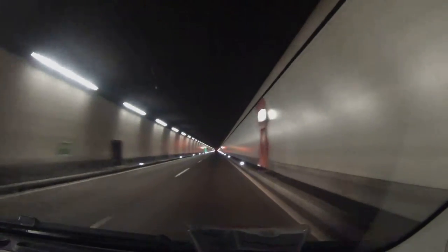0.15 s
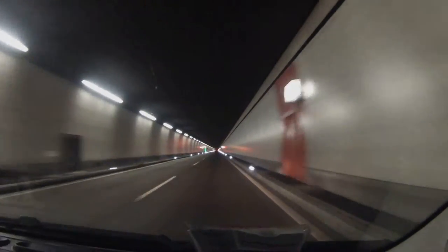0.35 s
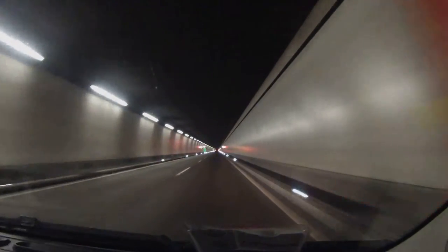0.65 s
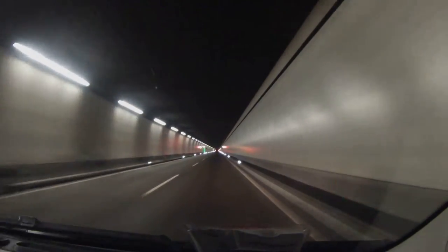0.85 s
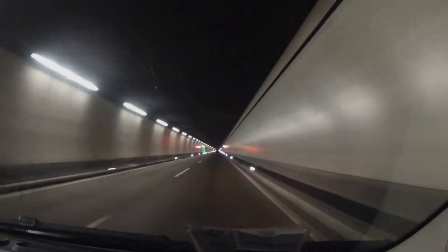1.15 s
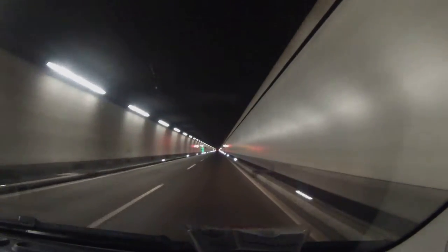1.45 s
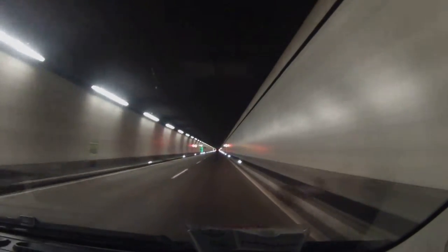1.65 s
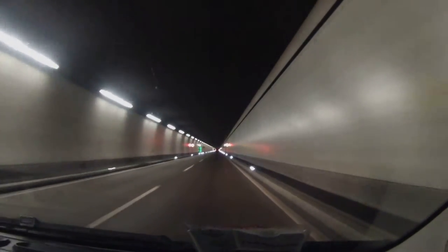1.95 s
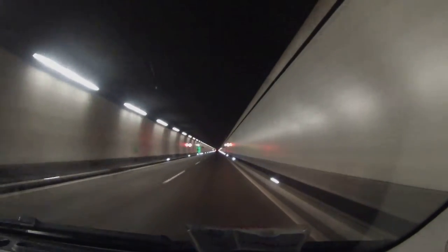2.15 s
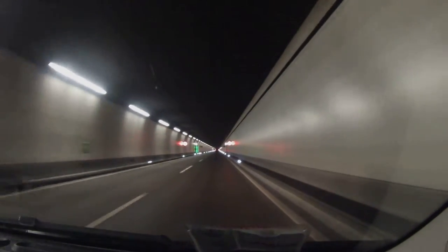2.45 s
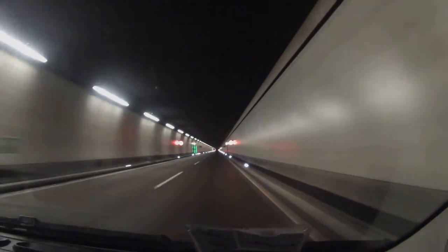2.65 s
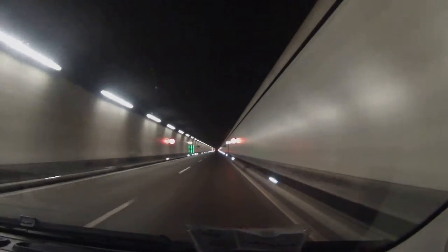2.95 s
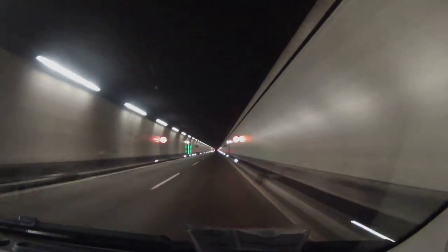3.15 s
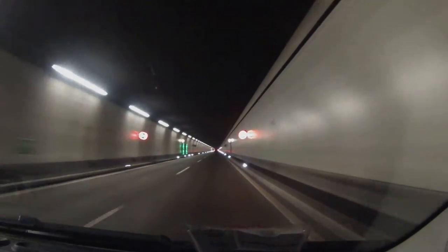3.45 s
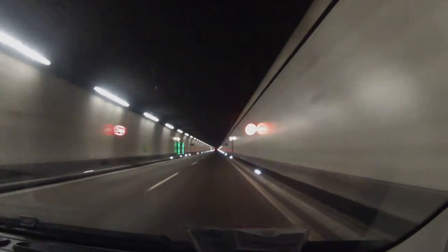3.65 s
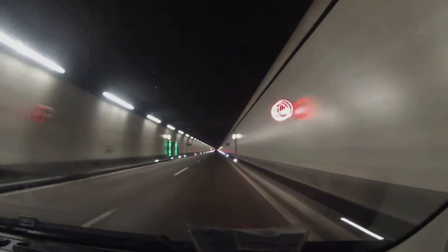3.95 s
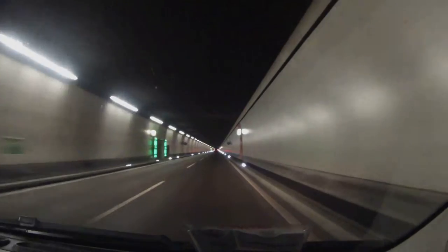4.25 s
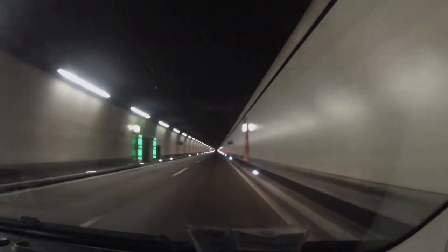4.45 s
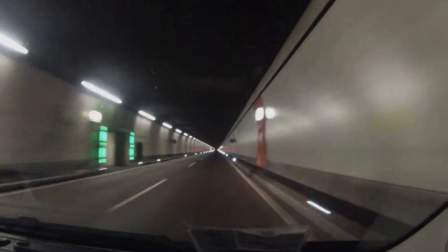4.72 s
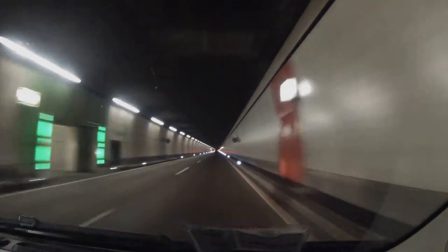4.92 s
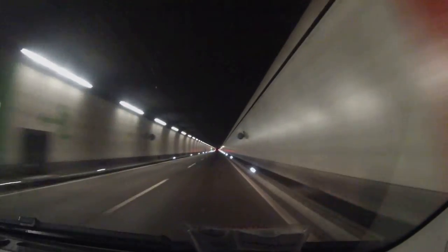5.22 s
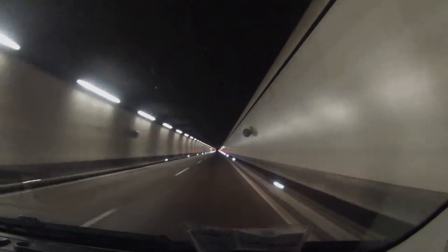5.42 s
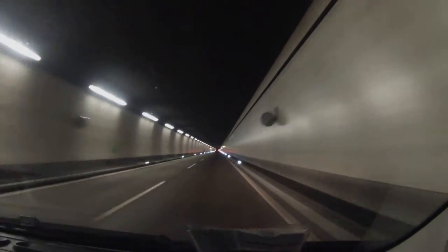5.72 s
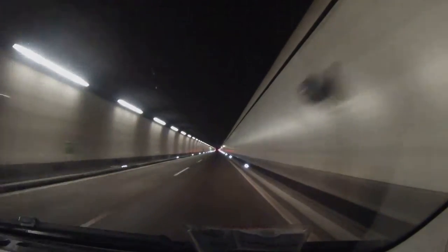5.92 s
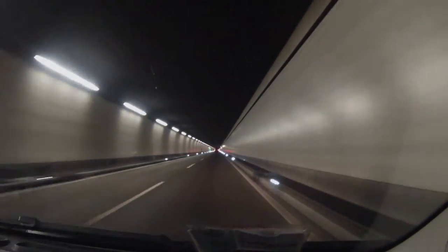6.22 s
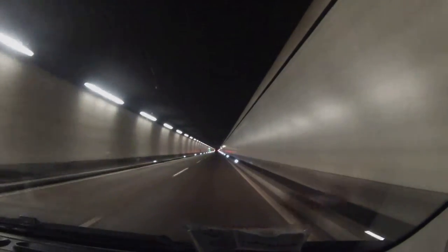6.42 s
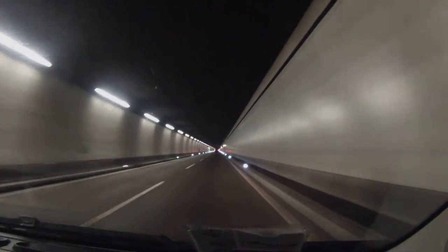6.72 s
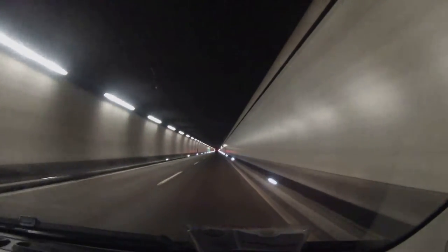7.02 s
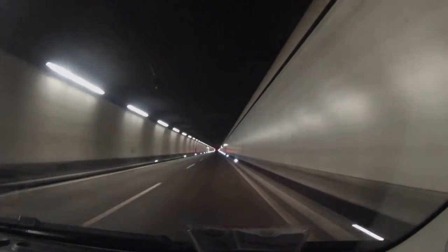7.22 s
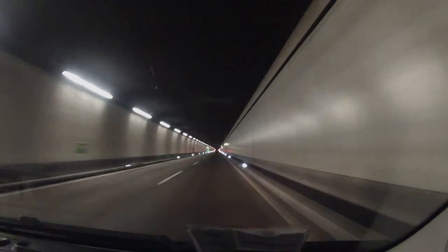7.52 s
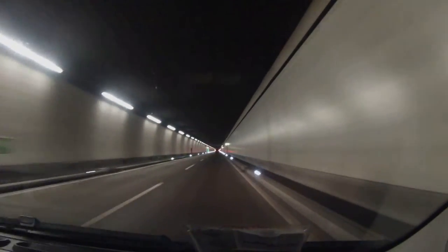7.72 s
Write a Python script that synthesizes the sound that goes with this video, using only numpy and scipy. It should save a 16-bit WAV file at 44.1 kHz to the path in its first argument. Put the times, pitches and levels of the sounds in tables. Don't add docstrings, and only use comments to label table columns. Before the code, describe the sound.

Continuous bass-heavy cabin rumble at motorway speed in a tunnel. Close, resonant low booms flutter and overlap without pause, over a steady low engine hum and dull tyre roar filtered by the glass. A very faint wavering gear whine, soft air rush, and the camera microphone's quiet hiss, whistle and rapid ticking sit above. No passing vehicles stand out; the drive never slows.

```python
import sys
import numpy as np
from scipy import signal
from scipy.fft import rfft, irfft, next_fast_len
from scipy.io import wavfile
from scipy.ndimage import uniform_filter1d, minimum_filter1d

SR = 44100
rng = np.random.default_rng(int(sys.argv[2]) if len(sys.argv) > 2 else 0)


def natural_amplitude(level_db):
    exponent = np.asarray(level_db, float) / 20
    return 10 ** exponent


def log_audio(samples):
    frames = np.atleast_2d(samples).T
    limited = np.clip(frames, -1, 1)
    pcm = np.round(limited * 32767).astype(np.int16)
    wavfile.write(sys.argv[1], SR, pcm)


N = 347067
T = np.arange(N) / SR
HZ = np.fft.rfftfreq(next_fast_len(N), 1 / SR)


def level(x, db):
    return x * natural_amplitude(db) / np.sqrt(np.mean(x ** 2))


def modes(rows, steep):
    power = 0
    for centre_hz, width_hz, db in rows:
        power = power + natural_amplitude(2 * db) / (1 + (2 * (HZ - centre_hz) / width_hz) ** 2) ** steep
    return np.sqrt(power)


def shape(x, gain):
    return irfft(rfft(x, next_fast_len(N)) * gain, next_fast_len(N))[:N]


def noise(gain):
    return shape(rng.standard_normal(N), gain) * np.sqrt(SR / 2)


def walk(rate_hz):
    hold = int(SR / rate_hz)
    steps = np.repeat(rng.standard_normal(N // hold + 1), hold)
    return 1.2 * uniform_filter1d(uniform_filter1d(steps, hold), hold)[:N]


def swells(bumps, smooth_db, grain_db, rate_hz):
    t = T[::64]
    peak_s, peak_db, length_s = np.transpose(bumps)[:, :, None]
    bells = np.sum(natural_amplitude(2 * peak_db) * np.exp(-(2 * (t - peak_s) / length_s) ** 2), axis=0)
    grain = natural_amplitude(2 * (smooth_db + grain_db * walk(rate_hz)))
    return 10 * np.log10(grain + np.interp(T, t, bells))


def boom(rows, db, hold_s, steep):
    ring = noise(modes(rows, steep))
    hold = int(hold_s * SR)
    power = np.abs(signal.hilbert(ring, next_fast_len(N))[:N]) ** 2 / 2
    slow_power = uniform_filter1d(uniform_filter1d(power, hold), hold)
    return natural_amplitude(db) * ring / np.sqrt(slow_power)


def hum(rows, wobble_hz, wobble_db, rate_hz):
    time_s, pitch_hz, level_db = np.transpose(rows)
    pitch = np.interp(T, time_s, pitch_hz) + wobble_hz * walk(rate_hz)
    phase = 2 * np.pi * np.cumsum(pitch) / SR
    size = natural_amplitude(np.interp(T, time_s, level_db) + wobble_db * walk(rate_hz))
    return np.sqrt(2) * size * np.sin(phase)


def body_heave():
    # centre_hz, width_hz, level_db
    heave_modes = [(20.2, 5.2, -0.5), (22.5, 4, -3.5)]
    # peak_s, peak_db, length_s
    heave_bumps = [(0.065, -28, 0.11), (0.49, -30.5, 0.1), (1.013, -28.5, 0.28), (1.471, -26, 0.26),
                   (1.9, -29, 0.26), (2.058, -21, 0.12), (2.258, -24.5, 0.09), (2.405, -29.5, 0.07),
                   (2.705, -26, 0.09), (2.934, -32.5, 0.05), (3.042, -28.5, 0.065), (3.352, -28.5, 0.22),
                   (3.676, -25, 0.079), (3.881, -29.5, 0.12), (4.193, -22.5, 0.052), (4.46, -25, 0.18),
                   (4.678, -23.0, 0.14), (5.281, -23.5, 0.09), (5.507, -26.5, 0.08), (5.943, -25, 0.18),
                   (6.211, -30.5, 0.13), (6.581, -32, 0.26), (6.825, -28.0, 0.054), (7.172, -24.5, 0.14),
                   (7.822, -32, 0.08)]
    return boom(heave_modes, swells(heave_bumps, -35, 4.5, 10), 0.038, 2.7)


def floor_boom():
    # centre_hz, width_hz, level_db
    floor_modes = [(95.8, 7.8, 0.0012), (99.9, 15, 0.0028)]
    # peak_s, peak_db, length_s
    floor_bumps = [(0.116, -27, 0.14), (0.285, -31, 0.04), (0.565, -30.5, 0.24), (0.902, -26.5, 0.06),
                   (1.049, -22.5, 0.06), (1.777, -30, 0.16), (2.068, -23, 0.04), (2.188, -28, 0.071),
                   (2.44, -25.5, 0.054), (2.804, -30.5, 0.23), (2.872, -25, 0.07), (3.079, -26.5, 0.04),
                   (3.174, -30.5, 0.041), (3.321, -33, 0.12), (3.442, -26, 0.05), (3.631, -25, 0.08),
                   (4.112, -27.5, 0.062), (4.626, -27, 0.063), (4.798, -28.5, 0.05), (5.023, -24, 0.07),
                   (5.572, -29, 0.05), (5.735, -24.5, 0.032), (5.845, -22.5, 0.041), (6.011, -28, 0.28),
                   (6.471, -28, 0.22), (6.977, -24.5, 0.087), (7.336, -29.5, 0.26), (7.643, -30, 0.11)]
    return boom(floor_modes, swells(floor_bumps, -35, 3.9, 17), 0.049, 2.03)


def roof_boom():
    # centre_hz, width_hz, level_db
    roof_modes = [(113.6, 8, -3), (123.7, 8.9, 1)]
    # peak_s, peak_db, length_s
    roof_bumps = [(0.011, -24.5, 0.064), (0.257, -26.5, 0.1), (0.404, -28.0, 0.05), (0.786, -30, 0.26),
                  (1.009, -25.5, 0.07), (1.254, -26.5, 0.29), (1.674, -29, 0.052), (1.858, -25, 0.07),
                  (2.105, -27, 0.04), (2.205, -21, 0.031), (2.595, -28.5, 0.04), (3.208, -22.5, 0.063),
                  (3.554, -20, 0.21), (3.873, -22, 0.04), (4.034, -24.5, 0.073), (4.573, -27.5, 0.3),
                  (4.862, -23.5, 0.091), (5.256, -29.5, 0.14), (5.841, -28, 0.074), (6.146, -26.5, 0.3),
                  (6.16, -22.0, 0.04), (6.621, -29, 0.07), (6.743, -29.5, 0.05), (6.962, -24, 0.052),
                  (7.07, -22.5, 0.043), (7.356, -26.0, 0.035), (7.485, -26, 0.037), (7.734, -28, 0.26)]
    return boom(roof_modes, swells(roof_bumps, -33, 3.8, 18), 0.036, 1.82)


def cabin_boom():
    # centre_hz, width_hz, level_db
    cabin_modes = [(133.8, 5, 3), (141.5, 7, -9)]
    # peak_s, peak_db, length_s
    cabin_bumps = [(0.408, -28.5, 0.29), (0.678, -22.5, 0.054), (1.021, -21.5, 0.13), (1.233, -24, 0.12),
                   (1.531, -24, 0.053), (1.863, -18.5, 0.044), (2.178, -22, 0.28), (2.284, -25.5, 0.06),
                   (2.493, -21, 0.065), (2.687, -19.5, 0.061), (2.936, -27.0, 0.19), (3.376, -22.5, 0.2),
                   (3.523, -13.5, 0.049), (3.598, -19, 0.07), (3.852, -26.5, 0.07), (4.072, -28.5, 0.26),
                   (4.19, -22, 0.058), (4.556, -22.5, 0.099), (4.687, -22.0, 0.092), (4.822, -21.5, 0.069),
                   (5.185, -20.5, 0.065), (5.345, -22.5, 0.057), (5.505, -24.0, 0.19), (5.873, -26, 0.27),
                   (6.174, -21.5, 0.24), (6.354, -25.0, 0.05), (6.502, -22.5, 0.032), (6.653, -27.0, 0.1),
                   (7.373, -25.5, 0.04), (7.753, -20.5, 0.043)]
    return boom(cabin_modes, swells(cabin_bumps, -32.5, 5.4, 14), 0.054, 1.73)


def tyres():
    # centre_hz, width_hz, level_db
    panel_modes = [(237.6, 22, 0), (259.9, 14, 0.5), (286.2, 33, -2), (304.2, 22, -6.5), (326.7, 26, -5)]
    # centre_hz, width_hz, level_db per Hz
    trim_modes = [(32.8, 14, -48.5), (60.7, 37, -55.5), (86.9, 3.3, -45), (159.7, 20, -52), (183, 16, -55),
                  (212.8, 27, -58.5), (359, 13, -66), (383, 30, -76), (414, 21, -66.5), (478, 86, -68),
                  (497, 24, -64.5), (561, 93, -73), (660, 60, -71), (706, 49, -67), (747, 54, -71.5)]
    # centre_hz, width_hz, level_db per Hz
    roar_modes = [(861, 120, -80), (1014, 190, -76), (1192, 142, -72), (1280, 100, -72), (1390, 180, -80),
                  (1553, 140, -75.5), (1641, 70, -72), (1718, 90, -75), (1830, 140, -80), (2102, 220, -84),
                  (2319, 193, -75), (2507, 180, -80), (2730, 260, -81.5), (3240, 90, -91)]
    # peak_s, peak_db, length_s
    asphalt_patches = [(0.6, -35, 0.54), (1.34, -37, 0.23), (2.079, -35.5, 0.12), (2.303, -35, 0.25),
                       (2.618, -34.5, 0.1), (2.876, -32.0, 0.1), (3.494, -35, 0.15), (3.686, -34, 0.11),
                       (4.925, -33, 0.12), (5.458, -35.5, 0.068), (5.643, -36, 0.09), (5.891, -37, 0.08),
                       (6.308, -34.5, 0.13), (7.691, -36, 0.23)]
    panels_db = swells(asphalt_patches, -34.5, 0.89, 8)
    coarse_db = panels_db - panels_db.mean()
    trim = natural_amplitude(0.22 * coarse_db + 0.45 * walk(12)) * noise(modes(trim_modes, 1.94))
    roar = natural_amplitude(0.1 * coarse_db + 0.53 * walk(9)) * noise(modes(roar_modes, 1.95))
    return boom(panel_modes, panels_db, 0.12, 2.05) + trim + roar


def engine():
    # time_s, pitch_hz, level_db
    firing_curve = [(0, 51.2, -40.5), (2, 50.5, -47.5), (3.4, 50.7, -43), (4.5, 50.4, -40.5),
                    (6, 49.57, -42), (7.87, 49.5, -43.5)]
    return natural_amplitude(2.0) * hum(firing_curve, 0.1, 1.5, 3)


def gear():
    # time_s, pitch_hz, level_db
    whine_curve = [(0, 1908, -71), (1, 1900, -64.5), (1.7, 1899, -68), (2.6, 1932, -65), (3.5, 1890, -66),
                   (4, 1904, -69.5), (4.8, 1920, -64), (5.7, 1890, -65), (6.2, 1908, -72.5),
                   (6.6, 1910, -67), (7.2, 1893, -64), (7.87, 1914, -67)]
    return hum(whine_curve, 2.8, 3.4, 12)


def rush():
    # corner_hz, density_db (dB per Hz)
    rush_curve = [(2300, -30.5), (2900, -2), (3500, -8.5), (4300, -15), (5200, -21), (7000, -25.5),
                  (10000, -29), (12500, -30), (12900, -25.5), (13700, -23), (14950, -29), (15050, -36),
                  (15250, -43), (15320, -67)]
    corner_hz, density_db = np.transpose(rush_curve)
    gain = natural_amplitude(np.interp(np.log(HZ + 1), np.log(corner_hz), density_db, left=-90, right=-90))
    return level(noise(gain), -59.5) * natural_amplitude(0.4 * walk(18))


def clock_whistles():
    # multiple (no unit), level_db
    clock_harmonics = [(4, -82), (5, -87.5), (6, -96), (7, -99), (8, -99), (11, -103), (12, -101),
                       (13, -90), (14, -93), (15, -102)]
    clock_hz = 999.9
    total = 0
    for multiple, db in clock_harmonics:
        phase = 2 * np.pi * (multiple * clock_hz * T + rng.random())
        total = total + np.sqrt(2) * natural_amplitude(db) * np.sin(phase)
    return total


def converter_whine():
    return hum([(0, 11120, -88), (7.87, 11050, -89)], 18, 1.5, 60)


def sparks():
    # centre_hz, width_hz, level_db
    spark_bands = [(4100, 500, -67), (5400, 650, -63.5), (6400, 400, -72.5), (7800, 500, -77),
                   (9000, 700, -78), (11300, 900, -76), (13600, 2000, -70.5)]
    first_tick_s, tick_s = 0.0005, 0.10241
    count, since_s = np.divmod(T - first_tick_s, tick_s)
    sizes = natural_amplitude(2.0 * rng.standard_normal(int(count.max()) + 2))
    size = sizes[count.astype(int) + 1]
    twin = sum(np.exp(-((since_s - lag_s) / 0.0003) ** 2) for lag_s in (0.0015, 0.0032))
    long = np.exp(-((since_s - 0.003) / 0.0028) ** 4) * (count % 10 == 4)
    gate = natural_amplitude(-60) * size * twin + natural_amplitude(-57.5) * long
    pattern = np.sign(rng.standard_normal(int(tick_s * SR) + 1))
    crackle = pattern[(since_s * SR).astype(int)]
    return shape(gate * crackle, modes(spark_bands, 1.3) * natural_amplitude(72))


def memory_write():
    # time_s, level_db
    write_curve = [
        (1.367, -95),
        (1.37, -68),
        (1.41, -68),
        (1.42, -71.5),
        (1.6, -71.5),
        (1.606, -95),
    ]
    time_s, level_db = np.transpose(write_curve)
    bands = [(12900, 600, 0), (13900, 600, -2), (4700, 300, 9), (10800, 500, -6)]  # Hz, width Hz, dB
    return natural_amplitude(np.interp(T, time_s, level_db)) * level(noise(modes(bands, 1.5)), 0)


def scene():
    road = body_heave() + floor_boom() + roof_boom() + cabin_boom()
    machinery = engine() + gear()
    camera = clock_whistles() + converter_whine() + sparks() + memory_write()
    return (road + tyres() + machinery + rush() + camera)[None]


def thin_treble(x):
    hz, _, cells = signal.stft(x, SR, nperseg=512, boundary="even")
    hz = hz[:, None]
    usual = np.median(np.abs(cells), axis=1, keepdims=True)
    loud = uniform_filter1d(np.sum(np.abs(cells) ** 2, axis=0), size=7)
    frames = np.repeat(rng.standard_normal(len(loud)), 2)[:len(loud)]
    patches = np.kron(rng.standard_normal((65, len(loud) // 4 + 1)), np.ones((4, 4)))
    patches = patches[:len(hz), :len(loud)]
    boom_db = 0.8 * 10 * np.log10(loud / np.median(loud))
    tilt_db = 3.0 * (hz - 15000) / 1000
    bar = usual * natural_amplitude(1.2 + boom_db + 3.0 * frames + 2.5 * patches + tilt_db)
    keep = (np.abs(cells) > bar) | (hz < 9500)
    return signal.istft(cells * keep, SR, nperseg=512)[1][:N]


def band_limit(x):
    return signal.sosfilt(signal.butter(12, 15390, fs=SR, output="sos"), x)


def record(dry):
    room_left = np.minimum(1, 0.42 / (np.abs(dry[0]) + 1e-9))
    limiter = uniform_filter1d(minimum_filter1d(room_left, size=1323), size=1323)
    wake = np.sin(np.pi / 2 * np.clip(0.2 + T / 0.012, 0, 1))
    mix = thin_treble(limiter * wake * dry[0])[None]
    return band_limit(mix)


dry = scene()
out = record(dry)
log_audio(out)
```